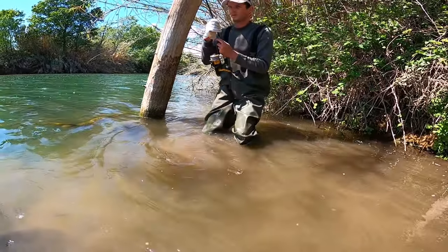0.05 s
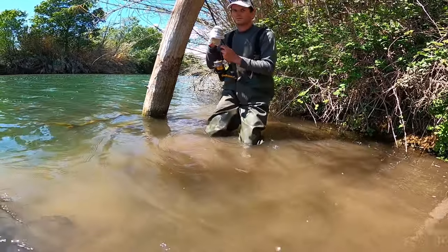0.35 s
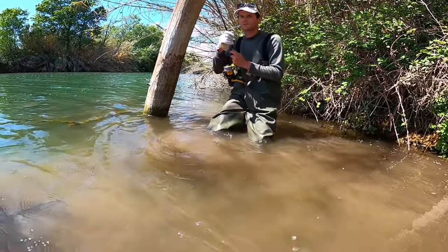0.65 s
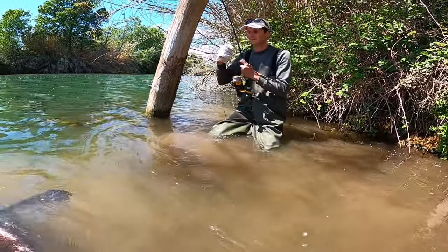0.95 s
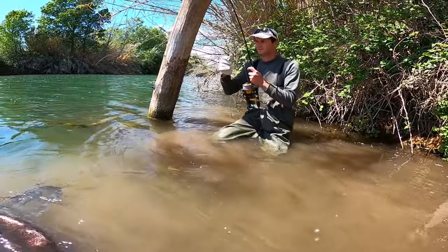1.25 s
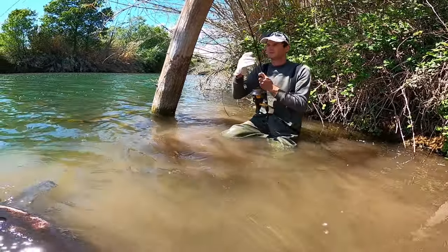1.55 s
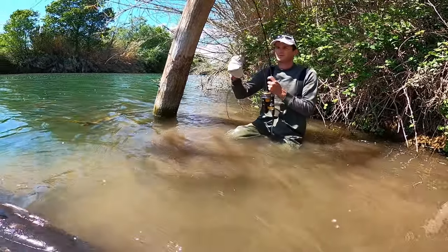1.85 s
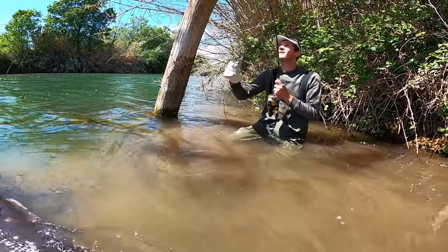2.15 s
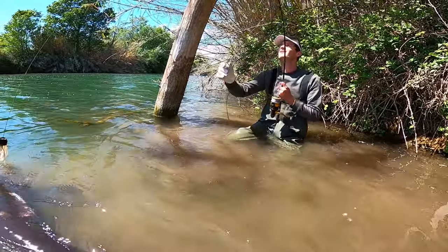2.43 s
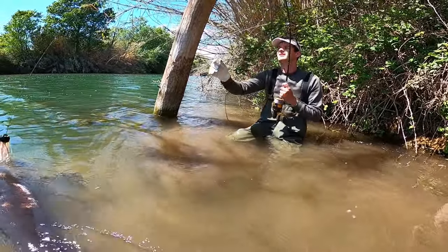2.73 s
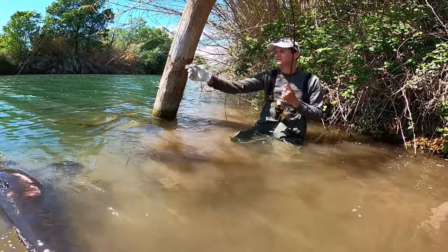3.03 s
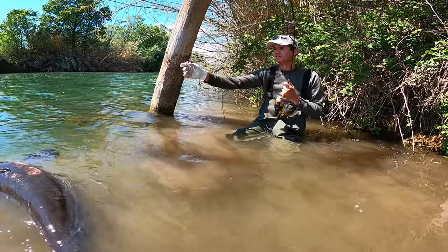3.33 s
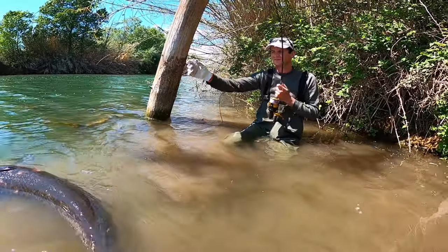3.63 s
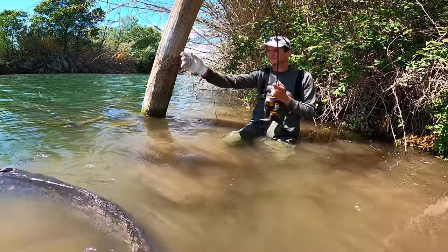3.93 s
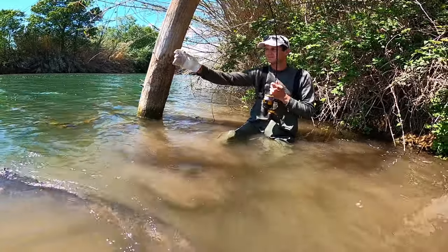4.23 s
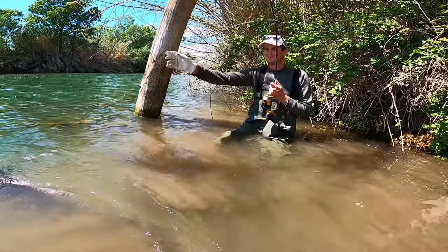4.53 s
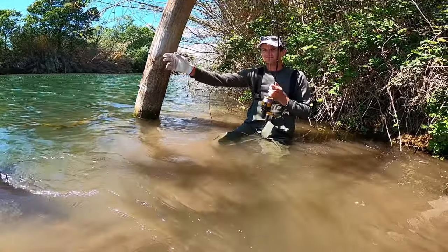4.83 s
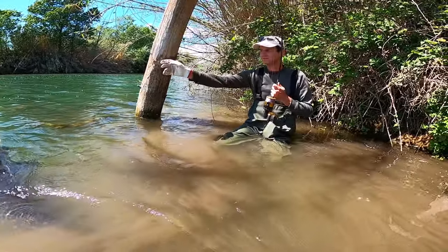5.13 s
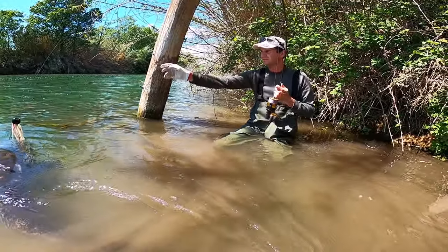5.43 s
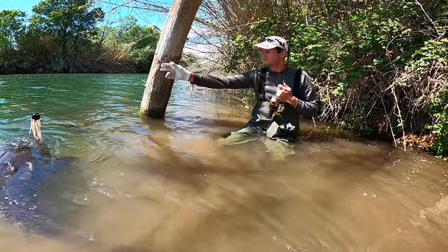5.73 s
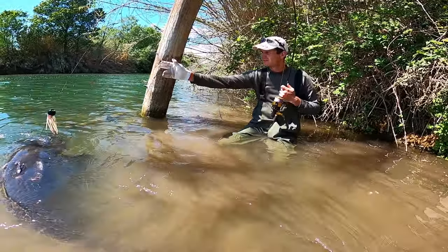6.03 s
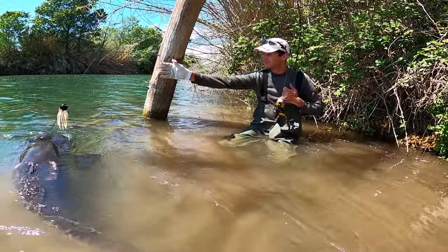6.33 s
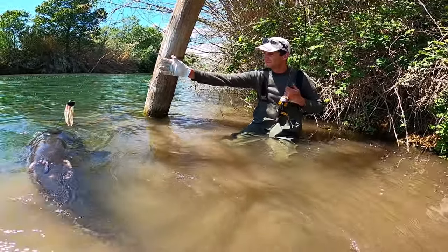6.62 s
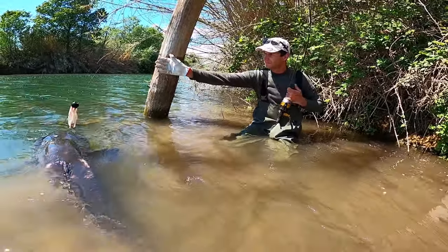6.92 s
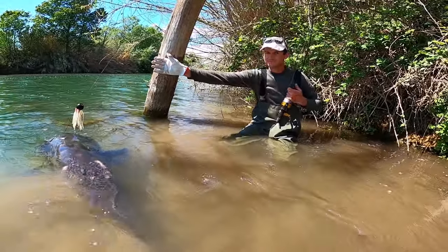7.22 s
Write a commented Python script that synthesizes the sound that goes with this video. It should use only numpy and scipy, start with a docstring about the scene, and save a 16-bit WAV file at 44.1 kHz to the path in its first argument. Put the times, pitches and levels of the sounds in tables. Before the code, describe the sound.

Outdoors on a river, a surfacing fish makes a few sharp, small splashes close by, followed by plops and trickling. A nearby fishing reel ticks, and line hisses and zips briefly. Farther off, a songbird twitters and whistles over the gentle current and a distant engine hum. Light lapping and dripping return later, while air flutters on the microphone, ending in one short buffet.

```python
"""A big fish rolls at the surface of a shallow river, close to the microphone, where an angler wades.
Water slaps on water, and trapped air rings as drips, plops and trickle. Just as near, his reel
clicks and line hisses off the spool. Farther off, a songbird's notes scatter through the bank trees
over the wash of the current and a far engine. Air flutters on the microphone; one late gust buffets it."""
import sys
import numpy as np
from scipy import signal
from scipy.fft import rfft, irfft, next_fast_len
from scipy.io import wavfile
from scipy.ndimage import uniform_filter1d

SR = 44100
rng = np.random.default_rng(int(sys.argv[2]) if len(sys.argv) > 2 else 0)


def generate_wav(sig):
    """Save sig (samples, or channels by samples) to the path in sys.argv[1] as 16-bit PCM at SR."""
    pcm = np.round(np.clip(np.atleast_2d(sig).T, -1, 1) * 32767).astype(np.int16)
    wavfile.write(sys.argv[1], SR, pcm)


N = 329427
T = np.arange(N) / SR
TOP_HZ = 15800  # upper edge of the treble

# Slaps on the surface, close to the microphone: (time [s], level [dB], decay time [s])
SLAPS = [(.2313, -20.5, 0.013), (.2382, -19.5, 0.014), (.7034, -27, 0.012), (.750, -30.5, 0.082),
         (.8235, -34, .01), (.8695, -37, .012), (.9083, -24, 0.031), (.988, -33, 0.016),
         (1.123, -36.5, 0.21), (1.704, -34.5, 0.073), (4.090, -40, 0.026), (4.725, -47, .08),
         (4.812, -46, 0.047), (4.865, -52, .06), (4.923, -41.5, 0.3), (5.466, -32, 0.0023),
         (5.545, -42, 0.046), (6.038, -42.5, 0.092)]
# Spectrum of one slap: (frequency [Hz], gain [dB])
SLAP_COLOUR = [(100, -7.5), (450, 1.5), (1400, 3), (2700, 6), (4000, -3), (5500, -17), (6900, -3),
               (8000, -15), (12000, -22), (15000, -40)]
def slaps(spatter_db=-11.5, grain_db=6):
    """Water hits water close by: a dull crack with a fading spatter behind it."""
    # minimum phase, so nothing sounds ahead of the hit
    cepstrum = irfft(np.log(response(SLAP_COLOUR, size=512)))
    cepstrum[1:256] *= 2
    cepstrum[257:] = 0
    crack = irfft(np.exp(rfft(cepstrum)))
    out = np.zeros((2, N))
    t = T[:SR // 4]
    for s, db, t60 in SLAPS:
        grains = rng.standard_normal((2, len(t))) * undb(-grain_db * rng.standard_normal(len(t)))
        burst = undb(spatter_db) * unit(grains) * decay(t, t60)
        burst[0, 0] += 1  # the first sharp contact
        add(out, s, undb(db) * excite(crack, burst, side_db=-33))
    return out


# Short pings close by: drops on the water and, at 2.48 s, a brief high tink as the line runs out:
# (time [s], pitch [Hz], level [dB])
SHORT_PINGS = [(.327, 4500, -38), (0.3473, 3010, -25.5), (.3515, 2000, -32.5), (.352, 420, -43),
               (.382, 2210, -41), (.391, 1400, -41), (.447, 3580, -37.5), (.452, 5070, -40),
               (.459, 6660, -47), (.568, 6960, -49), (.596, 1780, -40), (.659, 3100, -37),
               (0.6912, 1930, -40), (0.704, 4530, -28.5), (0.7032, 950, -34.5), (0.7031, 295, -31),
               (0.749, 3300, -33), (0.7595, 4250, -36), (.7715, 4400, -42), (.756, 1520, -25),
               (0.7732, 2920, -37), (.822, 1350, -31.5), (.868, 1150, -41), (.869, 3400, -44),
               (0.889, 1200, -33), (0.9082, 3020, -8.5), (0.908, 380, -36), (0.925, 4300, -35),
               (1.075, 1070, -43.5), (1.127, 1140, -31.5), (1.213, 2710, -42), (1.914, 1580, -42),
               (1.951, 2630, -41.5), (2.071, 2460, -45), (2.147, 1890, -39.5), (2.4841, 8400, -33.5),
               (4.734, 1290, -40), (4.821, 4250, -33.5), (4.823, 5100, -39), (4.835, 2730, -41.5),
               (4.87, 7430, -48), (4.883, 3620, -42), (4.923, 2240, -37), (4.946, 3020, -37),
               (4.9714, 2070, -40.5), (4.99, 2550, -49), (5.022, 2700, -51), (5.326, 5280, -33.5),
               (5.546, 1460, -37), (6.400, 1140, -42.5), (6.435, 3270, -41.5), (6.449, 1340, -43)]
PING_T60_S, PING_GLIDE_OCT = 0.014, -0.1
def short_pings(typical_db=-40, choke=0.29):
    """The bubbles left by drops, and one high tink; the louder a ping, the sooner it dies."""
    out = np.zeros((2, N))
    for s, hz, db in SHORT_PINGS:
        t60 = PING_T60_S * undb(-choke * (db - typical_db))
        add(out, s, undb(db) * ring(hz, PING_GLIDE_OCT, t60, swell_cycles=1))
    return out


# Air pulled under, close by: (time [s], pitch [Hz], glide [octaves], decay time [s], level [dB])
PLOPS = [(0.1107, 2106, -0.36, 0.046, -34), (1.148, 4720, -0.13, 0.17, -42.5),
         (1.5935, 1700, 0.43, 0.056, -29.5), (1.611, 1380, 0.35, 0.045, -42),
         (2.245, 1473, -0.084, 0.07, -34.5), (2.323, 1690, -0.053, 0.057, -43),
         (2.348, 1176, 0.16, 0.056, -40), (4.724, 1128, -0.37, 0.071, -36),
         (4.789, 697, -0.098, 0.057, -48.5), (4.948, 1188, -0.067, 0.079, -42.5),
         (5.126, 1084, -0.071, 0.1, -49), (5.544, 1178, -0.55, 0.078, -37.5),
         (6.364, 2010, -0.15, 0.025, -41.5)]
def plops(shake_db=3.5, shed_count=4, shed_lowest_hz=1250, shed_db=-13, shed_within_s=0.014):
    """A big bubble rings at its breathing mode and sheds smaller ones."""
    out = np.zeros((2, N))
    for s, hz, glide, t60, db in PLOPS:
        tone = ring(hz, glide, t60, swell_cycles=1)
        # the longer a bubble lasts, the more the moving surface shakes it
        shake = np.minimum(T[:len(tone)] / .025, 1) * walk(260, size=len(tone))
        add(out, s, undb(db + shake_db * shake) * tone)
        for delay, octaves in rng.random((shed_count, 2)):
            ping = ring(shed_lowest_hz * 2 ** octaves, PING_GLIDE_OCT, PING_T60_S, swell_cycles=0.38)
            add(out, s + delay * shed_within_s, undb(db + shed_db) * ping)
    return out


# Near air pockets: (time [s], length [s], start pitch [Hz], end pitch [Hz], level [dB])
GURGLES = [(1.288, 0.018, 453, 520, -40.5), (1.315, 0.051, 551, 1600, -45.5), (2.253, 0.045, 910, 710, -50),
           (2.316, 0.0347, 703, 1085, -49), (5.462, 0.06, 765, 840, -49)]
def gurgles(roughness=0.077):
    """An air pocket sweeps unevenly in pitch as it fills."""
    out = np.zeros((2, N))
    for s, length, start_hz, end_hz, db in GURGLES:
        hz = np.geomspace(start_hz, end_hz, int(length * SR))
        hz *= 1 + roughness * walk(361, size=len(hz))
        add(out, s, undb(db) * sweep(hz, softness=0.18))
    return out


# Where the fish surfaces in front of the microphone: (time [s], left minus right [dB])
FISH_SIDE = [(0, 0.5), (4.0, 3), (4.7, 8), (5.0, 12), (5.35, 2), (6.4, 7)]
def around_fish():
    """Pings, plops and gurgles are heard from the side where the fish breaks the surface."""
    left_gain = np.sqrt(curve(FISH_SIDE))
    return (short_pings() + plops() + gurgles()) * np.array([left_gain, 1 / left_gain])


# Near surges as the fish rolls or the angler steps: (time at full strength [s], hold [s], level [dB])
SURGES = [(0.375, 0.3, -53.5), (0.663, 0.64, -52), (1.45, 0.16, -59.5), (2.114, 0.22, -53),
          (3.5, 0.11, -59.5), (4.705, 0.27, -57), (6.27, 0.11, -58), (6.902, 0.18, -63)]
# Spectra of their trickle, slosh and spray: (frequency [Hz], gain [dB])
TRICKLE_COLOUR = [(200, -5), (500, -21), (1200, 12), (2500, 10), (4500, 6), (7000, 4.5), (13000, -65)]
SLOSH_COLOUR = [(60, -54), (150, 5), (280, -1), (480, -6), (900, -11.5), (2500, -39)]
SPRAY_COLOUR = [(1500, -14), (3000, -8), (4500, 13), (5600, -7), (7000, -12), (9500, -0.5), (12500, -12),
                (15000, -26)]
def trickle(level_db=-3.5, calm_db=-74, froth_db=-9, spray_db=-8):
    """Tiny bubbles and froth follow each surge; only strong surges slosh low and throw spray."""
    surges = [undb(db) * swell(s, hold, rise_s=0.16, fall_s=0.27) for s, hold, db in SURGES]
    stir = np.max(surges, axis=0) + undb(calm_db)
    force = stir / stir.max()
    bubbles = tiny_bubbles(count=4500, lowest_hz=459, pitch_ratio=19.15, cycles=23.4, spread_db=2)
    fizz = colour(bubbles, TRICKLE_COLOUR)
    froth = undb(froth_db) * noise(TRICKLE_COLOUR, side_db=-31)
    gulps = undb(4 * walk(60))
    slosh = gulps * colour(rng.standard_normal(N), SLOSH_COLOUR) * force ** 2
    droplets = tiny_bubbles(count=3000, lowest_hz=3000, pitch_ratio=4, cycles=9, spread_db=6)
    spray = undb(spray_db) * force * colour(droplets, SPRAY_COLOUR)
    churn_db = walk(30)
    return (fizz + froth + slosh + spray) * stir * undb(level_db + churn_db)


def tiny_bubbles(count, lowest_hz, pitch_ratio, cycles, spread_db):
    """A stream of tiny bubbles of random pitch and place, a few stronger than the rest."""
    out = np.zeros((2, N))
    for when, height, strength, life, place in rng.random((count, 5)):
        hz = lowest_hz * pitch_ratio ** height
        db = -spread_db * np.log(0.038 + strength)
        ping = ring(hz, 0.16, cycles * (.5 + life) / hz, swell_cycles=0.57)
        add(out, when * N / SR, pan(undb(db) * ping, 6 * (place - .5)))
    return out


# Wavelets near the microphone: (time [s], hold [s], typical bubble pitch [Hz], level [dB])
LAPS = [(0.057, 0.015, 1610, -52.5), (.09, .04, 590, -64), (0.068, 0.014, 3870, -53.5),
        (0.378, 0.024, 1690, -54), (.56, 0.087, 450, -69), (0.66, 0.018, 450, -56.5),
        (0.675, 0.02, 2090, -51), (0.748, 0.0099, 430, -49), (0.761, 0.012, 3750, -49.5),
        (0.798, 0.02, 1400, -52), (0.913, 0.028, 340, -54.5), (0.939, 0.049, 2520, -53.5),
        (1.126, 0.03, 1360, -46), (1.137, 0.065, 293, -50.5), (1.134, 0.033, 2920, -50),
        (1.198, 0.067, 1900, -59), (1.302, 0.038, 1300, -58), (.47, .16, 6500, -67), (1.34, .1, 6500, -66),
        (1.961, 0.1, 1320, -59), (2.108, .03, 1010, -60), (2.234, 0.063, 4000, -54.5),
        (4.68, 0.042, 1390, -62), (4.812, 0.022, 2500, -58), (4.864, 0.0052, 6000, -63),
        (4.937, 0.053, 2230, -59), (6.048, 0.015, 1390, -61.5), (6.197, 0.047, 1340, -66)]
def laps(rise_s=0.014, fall_s=0.045, spread_oct=0.422, cycles=15, spread_db=3, count=110):
    """Each small wave folds over in a dense patter of bubbles, from low gulps to high spatter."""
    out = np.zeros((2, N))
    for s, hold, hz, db in LAPS:
        length = rise_s + hold + fall_s
        patter = np.zeros((2, int(length * SR)))
        for when, (height, strength, place) in zip(rng.random(count), rng.standard_normal((count, 3))):
            pitch = min(hz * 2 ** (spread_oct * height), TOP_HZ)
            ping = ring(pitch, 0.51, cycles / pitch, swell_cycles=.57)
            add(patter, when * length, pan(undb(spread_db * strength) * ping, 2 * place))
        envelope = np.interp(T[:patter.shape[1]], [0, rise_s, rise_s + hold, length], [0, 1, 1, 0])
        add(out, s - rise_s, undb(db) * envelope * unit(patter))
    return out


# Resonances of the reel: (frequency [Hz], bandwidth [Hz], level [dB])
REEL_MODES = [(2300, 140, 2), (4400, 150, 0), (4440, 530, 21), (6340, 1600, 10), (7580, 550, 5.5),
              (8240, 390, 11.5), (11650, 3400, -1)]
def reel_body(vary_db, tilt_db_per_oct=0):
    """The reel rings; each contact favours its resonances a little differently."""
    t = T[:512]
    body = np.zeros(len(t))
    for hz, width, db in REEL_MODES:
        tilt_db = tilt_db_per_oct * np.log2(hz / REEL_MODES[0][0])
        gain = undb(db + vary_db * rng.standard_normal() + tilt_db)
        body += gain * width * np.exp(-np.pi * width * t) * np.sin(2 * np.pi * hz * t)
    return body


# Reel and tackle, close to the microphone: (time [s], level [dB], decay time [s])
CLICKS = [(1.237, -38, 0.016), (1.341, -37, 0.0072), (1.356, -37, 0.013), (1.5028, -28.5, .016),
          (1.5524, -34, 0.014), (1.605, -33, 0.0082), (1.624, -32.5, 0.026), (1.653, -31.5, 0.027),
          (1.7037, -32, 0.013), (2.07, -39.5, 0.0091), (2.156, -36, .02), (2.1633, -20, 0.0059),
          (2.1652, -26.5, 0.0056), (2.463, -42, 0.0096), (2.484, -40, 0.0062), (2.956, -34, .03),
          (4.090, -41.5, 0.011), (5.325, -38, 0.01)]
def reel_clicks(rise_s=0.00057, rustle_db=-21.5, rustle_t60_s=0.091, typical_db=-27.5):
    """A quick scrape of tiny contacts rings the reel and trails off in a rustle of gear."""
    out = np.zeros((2, N))
    t = T[:SR // 4]
    for s, db, t60 in CLICKS:
        rustle = undb(rustle_db + 3 * walk(200, size=len(t))) * decay(t, rustle_t60_s)
        envelope = np.minimum(t / rise_s, 1) * (decay(t, t60) + rustle)
        body = reel_body(vary_db=9, tilt_db_per_oct=db - typical_db)  # harder is brighter
        scrape = envelope * rng.standard_normal((2, len(t)))
        add(out, s, undb(db) * excite(body, scrape, side_db=-7))
    return out


# Line leaving the spool, close by: (time [s], hold [s], level [dB])
LINE_RUNS = [(0.456, 0.51, -69.5), (1.112, 0.41, -73), (1.573, 0.12, -69.5), (2.11, 0.056, -58.5),
             (2.24, 0.2, -61)]
# Line jerked through the rod rings: (time [s], length [s], level [dB])
ZIPS = [(1.328, 0.058, -61), (2.948, 0.051, -45.5), (4.4, 0.056, -56.5), (5.666, 0.02, -55)]
# Spectra of the hiss and the zips: (frequency [Hz], gain [dB])
LINE_COLOUR = [(1500, -2), (2900, -4), (3800, 14), (4600, 11), (6200, 1.5), (7600, 10), (8400, 6),
               (10300, -2.5), (12300, 2.5), (15000, -15)]
ZIP_COLOUR = [(1500, -8), (2800, 3.5), (4200, 9.5), (5500, -0.5), (7500, -1), (10000, -16), (12500, -10),
              (15000, -35)]
def running_line(hiss_db=5.5, rasp_db=1.9, ticks_per_s=300, tick_spread_db=3.5):
    """Line hisses jerkily over the spool lip, ticks against the reel and zips through the rings."""
    body = reel_body(vary_db=6)
    jerky_db = 2 * walk(150)
    grain = unit(undb(rasp_db * walk(700) + jerky_db))
    run = sum(undb(db) * swell(s, hold, rise_s=0.027, fall_s=0.13) for s, hold, db in LINE_RUNS)
    hiss = undb(hiss_db) * run * noise(LINE_COLOUR, side_db=-5.5)
    snags = (rng.random(N) < ticks_per_s / SR) * undb(tick_spread_db * rng.standard_normal(N))
    ticks = run * unit(signal.fftconvolve(snags, body)[:N])
    # a zip starts abruptly and runs down
    jerks = sum(undb(db) * np.interp((T - s) / length, [0, .15, .4, 1.2], [0.0034, 1, 1, 0.031])
                for s, length, db in ZIPS)
    zips = jerks * noise(ZIP_COLOUR, side_db=-3)
    return ticks + grain * (hiss + zips)


# Fluted notes from the bank trees:
# (time [s], length [s], start pitch [Hz], slur [octaves], rasp [share of pitch], level [dB])
WHISTLES = [(2.995, 0.053, 2880, -0.018, .008, -52), (3.458, 0.077, 3730, -.02, 0.003, -46.5),
            (3.597, 0.093, 4300, 0.046, .014, -47.5), (3.725, 0.059, 2394, -0.029, .005, -51),
            (3.916, 0.09, 3190, -0.12, 0.028, -45), (4.106, 0.096, 2700, -0.037, 0.012, -43.5),
            (4.201, .08, 2590, -0.24, .014, -51), (4.381, .12, 3390, -0.046, 0.014, -47),
            (4.631, 0.056, 3430, -0.014, .016, -44.5), (4.676, 0.047, 3310, -0.15, 0.032, -46.5),
            (4.778, 0.12, 4090, 0.076, .02, -44.5), (4.985, .12, 3990, -0.016, 0.013, -46.5),
            (5.094, 0.073, 3420, -.03, .007, -49), (5.214, 0.11, 3380, 0.063, 0.015, -44.5),
            (5.41, 0.088, 2752, -0.056, 0.015, -43), (6.521, 0.053, 3290, -.24, 0.037, -48),
            (6.679, .05, 3110, -0.091, 0.054, -48), (6.687, .06, 3240, -0.013, .005, -54),
            (6.868, 0.087, 3416, 0.007, .005, -53)]
# Twitters from the same perch: (time [s], level [dB])
TWITTERS = [(2.34, -53), (2.505, -46), (2.68, -46), (2.83, -52), (6.44, -50), (6.615, -48.5), (6.785, -51),
            (6.98, -54.5)]
# A twitter's high chip and low rising chip: (delay [s], start pitch [Hz], slur [octaves], level [dB])
TWITTER_CHIPS = [(0, 4016, -.1, 1), (.04, 1850, 0.53, 0.5)]
def bird(level_db=-2, direct_gain=.42, trees_db=-1, vary_oct=0.042):
    """A songbird off to the left, heard straight through the leaves and scattered by the trees."""
    song = np.zeros((1, N))
    for s, length, hz, slur, rasp, db in WHISTLES:
        add(song, s, undb(db) * bird_note(hz, slur, length, rasp))
    for s, db in TWITTERS:
        for delay, hz, slur, chip_db in TWITTER_CHIPS:
            chip = bird_note(hz * 2 ** rng.normal(0, vary_oct), slur, length_s=.06, rasp=0.0848)
            add(song, s + delay, undb(db + chip_db) * chip)
    trees = undb(trees_db) * scatter(song, t60=0.38, size=SR)
    return undb(level_db) * pan(direct_gain * song + trees, 4.8)


def bird_note(start_hz, slur_oct, length_s, rasp, waver=0.006):
    """One slurred note that swells softly; its pitch wavers slowly and rasps quickly."""
    hz = start_hz * 2 ** np.linspace(0, slur_oct, int(length_s * SR))
    wobble = waver * walk(62.8, size=len(hz)) + rasp * walk(450, size=len(hz))
    return sweep(hz * (1 + wobble), softness=0.14)


# Wash of river and leaves around the microphone: (frequency [Hz], gain [dB])
WASH_COLOUR = [(190, -43), (330, -4.5), (592, -5.5), (780, -9.5), (900, -10), (1060, -2.5), (1290, -2),
               (1360, 0), (1590, -0.5), (2170, -2), (5130, -2.5), (7340, -9.5), (9060, -21.5),
               (12500, -29.5), (16000, -47)]
# Its stereo width: (frequency [Hz], side minus mid [dB])
WASH_WIDTH = [(300, -3.5), (1300, -11), (2400, -6.5), (5000, -7.5), (9000, -3), (15000, 4)]
def river(level_db=-56.5):
    """The even wash of the current, flickering slightly and widest in the high treble."""
    size = next_fast_len(N)
    mid, side = colour(rng.standard_normal((2, N)), WASH_COLOUR)
    side = irfft(rfft(side, size) * response(WASH_WIDTH, size), size)[:N]
    flicker_db = .5 * walk(12)
    return pan(stereo(mid, side), 1.7) * undb(level_db + flicker_db)


# An engine far from the river: (time [s], firing tone [dB], overtones [dB], rumble [dB])
ENGINE_LEVELS = [(0, -66, -67, -56), (1.2, -59, -60.5, -58.5), (1.9, -56.5, -60.5, -54.5),
                 (2.25, -48.5, -54.5, -52.5), (2.7, -44.5, -51.5, -51), (3.5, -48.5, -57.5, -52),
                 (4.1, -56, -63, -60), (4.7, -48, -62.5, -55.5), (5.4, -57.5, -70.5, -58.5),
                 (6.1, -65, -64, -56.5), (6.6, -51.5, -60.5, -54), (6.95, -64, -63, -58)]
# Its speed: (time [s], firing rate [Hz])
FIRING_RATE = [(0, 79.5), (1.9, 80), (2.6, 80.7), (3.37, 83.2), (4.05, 84.1), (4.8, 85), (5.7, 82.5),
               (6.6, 82.5)]
# Its overtones: (order [multiple of shaft rate], level [dB])
SHAFT_ORDERS = [(9, -0.5), (12, -0.5), (13, -4), (15, -5.5), (19, -10)]
# Spectrum of its rumble: (frequency [Hz], gain [dB])
RUMBLE_COLOUR = [(60, -2), (110, 1), (138, -2), (165, 8.5), (182, 1), (200, 5.5), (222, -4.5), (250, -1.5),
                 (310, -6), (420, -13.5), (600, -24.5), (1000, -50)]
def engine(firings_per_turn=5, overtones_db=-.5, rumble_db=-1, waver=0.0061, shimmer_db=3):
    """Far firing tone, shaft overtones and rumble, creeping in speed and fading on the wind."""
    shaft_hz = np.interp(T, *np.transpose(FIRING_RATE)) / firings_per_turn
    phase = 2 * np.pi * np.cumsum(shaft_hz * (1 + waver * walk(16))) / SR
    firing = unit(np.sin(firings_per_turn * phase) * undb(1.8 * walk(22)))
    overtones = unit(sum(np.sin(k * phase) * undb(db + shimmer_db * walk(14)) for k, db in SHAFT_ORDERS))
    rumble = noise(RUMBLE_COLOUR, side_db=-11)
    return (curve(ENGINE_LEVELS) * firing
            + undb(overtones_db) * curve(ENGINE_LEVELS, column=2) * overtones
            + undb(rumble_db) * curve(ENGINE_LEVELS, column=3) * rumble)


# Spectrum of air passing right over the microphone: (frequency [Hz], gain [dB])
BREEZE_COLOUR = [(15, -2), (35, -2.5), (60, 1), (110, -8), (250, -24.5), (600, -74)]
# Puffs on the microphone: (time [s], level [dB], left minus right [dB])
PUFFS = [(.15, -47, -1), (.66, -54, -1), (1.03, -50, 0), (2.18, -45, 4), (2.95, -53, -3), (3.66, -51, 13),
         (5.18, -53, 1), (6.65, -65, 0), (7.17, -35, 15)]
# Eddies hitting its ports: (time [s], pitch [Hz], decay time [s], level [dB], left minus right [dB])
BUFFETS = [(7.115, 167, 0.099, -35, -9), (7.141, 175, 0.033, -23.5, 9), (7.171, 170, 0.036, -23.5, -7),
           (7.175, 62, 0.15, -39, 33), (7.215, 130, 0.053, -41, 7)]
def wind(breeze_db=-54, swing_db=1.5, crossing_s=0.0055):
    """Low flutter, puffs and the thumps of one gust; each eddy reaches the right port a little later."""
    flow = undb(breeze_db + swing_db * walk(5.2))
    puffs = sum(pan(undb(db) * swell(s, 0, rise_s=0.13, fall_s=0.12) ** 2, pan_db)
                for s, db, pan_db in PUFFS)
    out = noise(BREEZE_COLOUR, side_db=-10) * (flow + puffs)
    for s, hz, t60, db, pan_db in BUFFETS:
        left = undb(db) * ring(hz, -1.06, t60, swell_cycles=0.49)
        t = T[:len(left)]
        right = np.interp(t - crossing_s, t, left)
        add(out, s, pan(np.array([left, right]), pan_db))
    return out


def undb(db):
    """Decibels to gain."""
    return 10 ** (np.asarray(db) / 20)


def unit(x):
    """Scale to rms 1."""
    return x / np.sqrt(np.mean(x ** 2) + 1e-20)


def curve(rows, column=1):
    """Gain that follows one dB column of a table over time."""
    rows = np.array(rows)
    return undb(np.interp(T, rows[:, 0], rows[:, column]))


def swell(s, hold, rise_s, fall_s):
    """Envelope that rises to 1 at time s, holds and falls."""
    return np.interp(T, [s - rise_s, s, s + hold, s + hold + fall_s], [0, 1, 1, 0])


def decay(t, t60):
    """Envelope that falls 60 dB in t60 seconds."""
    return np.exp(-np.log(1000) * t / t60)


def pan(x, db):
    """Place a sound by its left minus right level."""
    return x * undb(np.array([[db], [-db]]) / 2)


def stereo(mid, side):
    """Mid and side to left and right."""
    return np.array([mid + side, mid - side])


def add(out, s, x):
    """Mix a short sound in at time s."""
    i = max(int(s * SR), 0)
    out[:, i:i + x.shape[-1]] += x[..., :max(out.shape[-1] - i, 0)]


def walk(rate_hz, size=N):
    """Smooth random wander with spread near 1."""
    step = max(int(SR / rate_hz), 2)
    stairs = np.repeat(rng.standard_normal(size // step + 1), step)
    return np.sqrt(3 / 2) * uniform_filter1d(stairs, step)[:size]


def response(points, size):
    """Gain on an FFT grid from (frequency [Hz], gain [dB]) points."""
    hz, db = np.transpose(points)
    return undb(np.interp(np.log(np.fft.rfftfreq(size, 1 / SR) + 1), np.log(hz), db))


def colour(x, points):
    """Give a long sound a spectrum; rms 1."""
    size = next_fast_len(N)
    return unit(irfft(rfft(x, size) * response(points, size), size)[..., :N])


def noise(points, side_db):
    """Coloured noise with a given stereo width."""
    mid, side = colour(rng.standard_normal((2, N)), points)
    return stereo(mid, undb(side_db) * side)


def ring(hz, glide_oct, t60, swell_cycles):
    """A damped, gliding oscillation that builds up over its first cycles."""
    t = np.arange(int(max(t60, .002) * 1.2 * SR)) / SR
    envelope = (1 - np.exp(-(t * hz / swell_cycles) ** 2)) * decay(t, t60)
    pitch = hz * 2 ** (glide_oct * t / t60)
    return envelope / envelope.max() * np.sin(2 * np.pi * np.cumsum(pitch) / SR)


def sweep(hz, softness):
    """A tone that follows a pitch track, fading in and out."""
    return np.hanning(len(hz)) ** softness * np.sin(2 * np.pi * np.cumsum(hz) / SR)


def excite(body, burst, side_db):
    """Play a mid and side burst through a body's impulse response; the mid peaks at 1."""
    mid, side = signal.fftconvolve(burst, body[None], axes=1)
    return stereo(mid, undb(side_db) * side) / np.abs(mid).max()


def scatter(x, t60, size):
    """Diffuse outdoor echo: many small reflections dying away."""
    tail = rng.standard_normal((2, size)) * decay(T[:size], t60)
    return signal.fftconvolve(x, tail / np.linalg.norm(tail[0]), axes=1)[:, :N]


def scene():
    """Water and tackle up close, echoing faintly off bank and surface; bird, river and engine beyond."""
    near = around_fish() + slaps() + trickle() + laps()
    near += pan(running_line() + reel_clicks(), -0.77)
    bank_echo = undb(-17) * scatter(near, t60=0.16, size=SR // 2)
    return near + bank_echo + bird() + river() + engine() + wind()


def record(dry):
    """The camera's microphone channel softens the top of the treble, then cuts it."""
    soft = signal.sosfilt(signal.butter(4, 14500, fs=SR, output="sos"), dry)
    return signal.sosfilt(signal.ellip(8, .2, 70, TOP_HZ, fs=SR, output="sos"), soft)


dry = scene()
out = record(dry)
generate_wav(out)
```